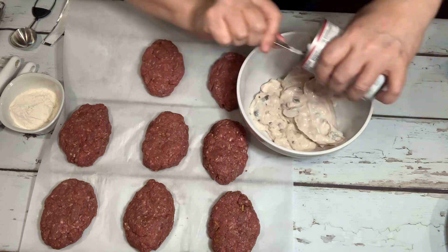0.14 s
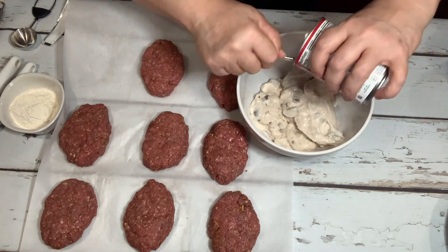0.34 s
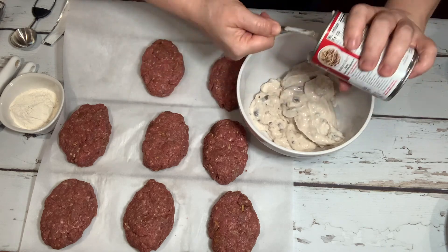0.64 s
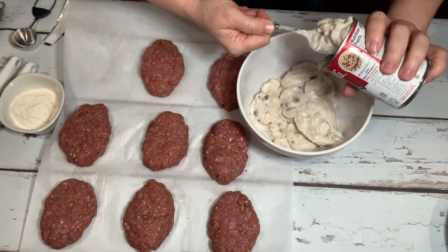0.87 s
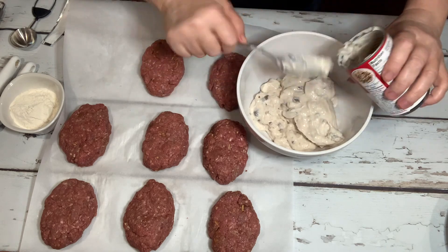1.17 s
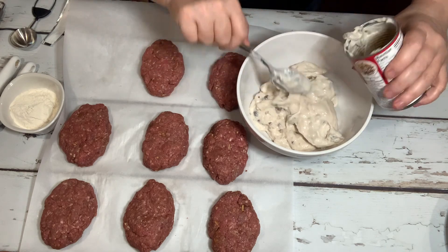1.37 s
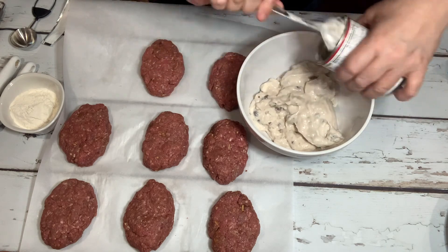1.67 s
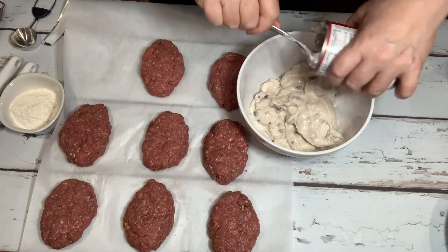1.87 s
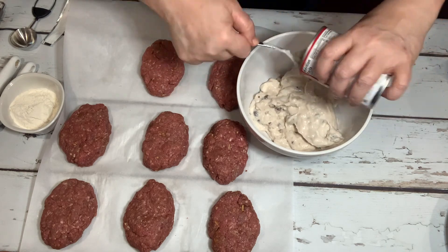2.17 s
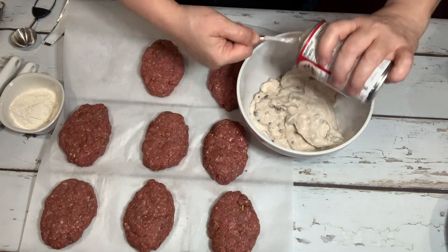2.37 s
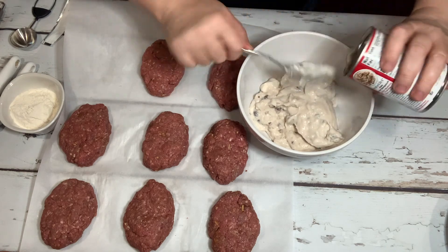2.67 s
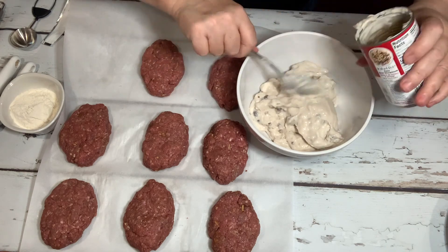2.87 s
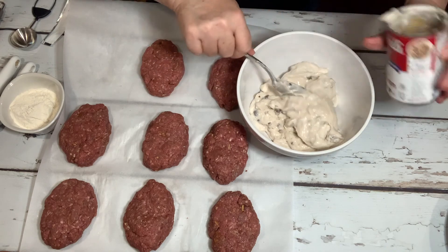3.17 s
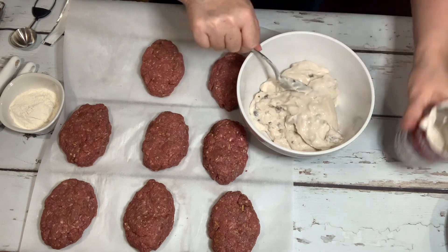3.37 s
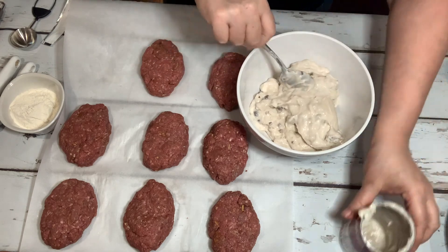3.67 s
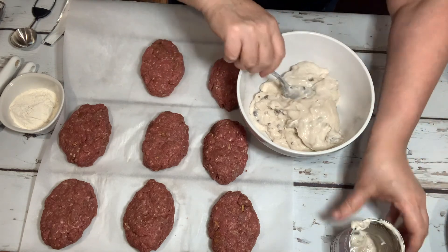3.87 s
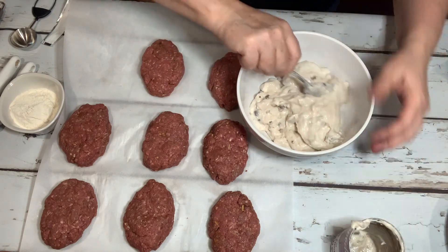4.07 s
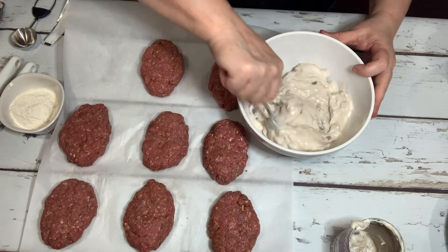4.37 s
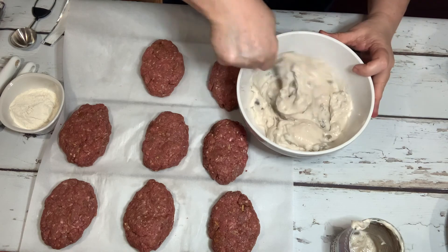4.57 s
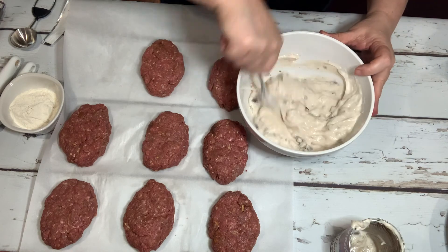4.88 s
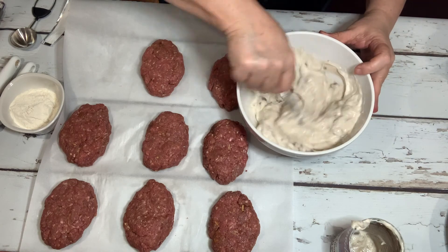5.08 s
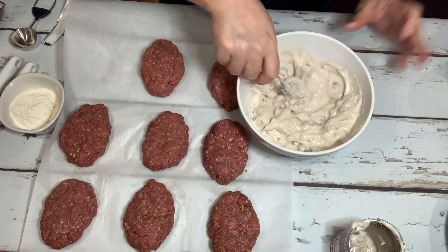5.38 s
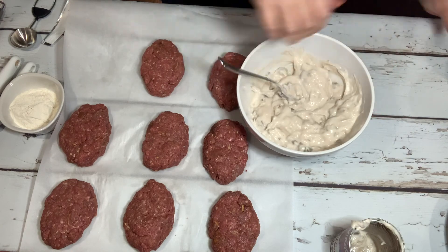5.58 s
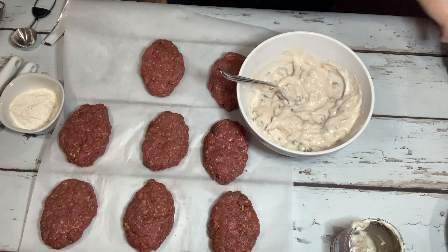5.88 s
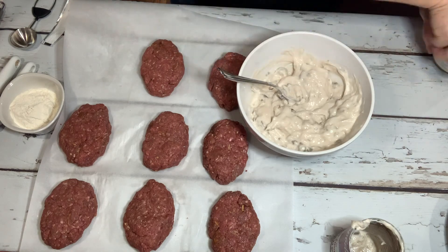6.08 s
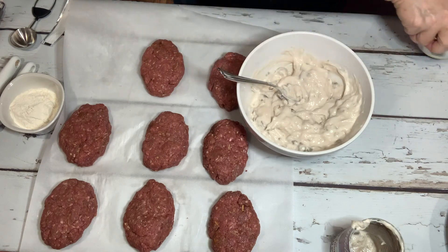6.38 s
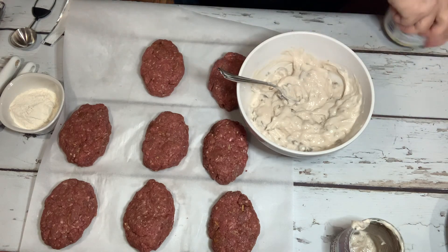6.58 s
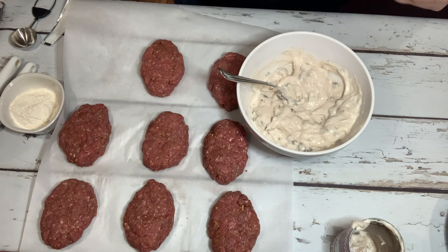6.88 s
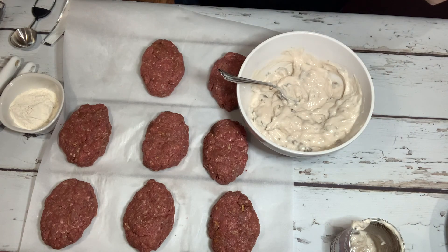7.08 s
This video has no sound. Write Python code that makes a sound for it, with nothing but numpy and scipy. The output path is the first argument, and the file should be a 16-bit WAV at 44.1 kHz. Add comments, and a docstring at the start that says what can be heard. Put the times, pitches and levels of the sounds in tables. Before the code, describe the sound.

A metal spoon scrapes thick food from a hollow tin can, clanks on a ceramic bowl, stirs with dull knocks, then a dish rubs across wood.

```python
"""A steel spoon scrapes thick soup out of a tin can into a ceramic bowl on a wooden kitchen table; an appliance hums.
0.2-2.5 s: stick-slip strokes, slides and taps excite the can's hollow note and wall modes; wet fizz follows.
3.1 s: the spoon clanks on the bowl's rim (beating modes). 3.7 s: the empty can lands on the table and rocks.
4.3-5.3 s: it stirs (gliding air-pocket notes) and knocks the filled bowl. 5.4 s: more rim clanks, then wet fizz.
6.3-7.2 s: a dish rubs over the boards (filtered slips and noise) and bumps. All in a small, hard room."""
import sys
import numpy as np
from scipy import signal
from scipy.fft import rfft, irfft, next_fast_len
from scipy.io import wavfile
from scipy.ndimage import map_coordinates

SR = 44100
rng = np.random.default_rng(int(sys.argv[2]) if len(sys.argv) > 2 else 0)


def wrap_up_sound(samples):
    """Save the sound to the file named by the first command line argument, as 16-bit audio."""
    columns = np.atleast_2d(samples).T
    # keep every value between -1 and 1, then stretch to whole-number steps
    tamed = np.clip(columns, -1, 1)
    steps = np.round(tamed * 32767).astype(np.int16)
    wavfile.write(sys.argv[1], SR, steps)


N = 319284
TIME = np.arange(N) / SR
T = np.arange(int(SR * 0.7)) / SR  # time within one blow or echo [s]


def amp(db):
    """Decibels to gain."""
    return 10 ** (np.asarray(db) / 20)


def unit(x):
    """Scaled to rms 1."""
    return x / np.sqrt(np.mean(x ** 2) + 1e-20)


def along(points, hz):
    """(Hz, value) points interpolated on a log-frequency axis."""
    point_hz, value = np.transpose(points)
    return np.interp(np.log(hz + 1), np.log(point_hz + 1), value)


def decay(t, t60_s):
    """Exponential decay of 60 dB in t60_s."""
    return np.exp(-np.log(1000) * t / t60_s)


def filtered(x, response):
    """x times a complex response of frequency."""
    n = x.shape[-1]
    padded = next_fast_len(n + 4096)
    hz = np.fft.rfftfreq(padded, 1 / SR)
    return irfft(rfft(x, padded) * response(hz), padded)[..., :n]


def coloured(x, spectrum):
    """x shaped by (Hz, dB) points."""
    return filtered(x, lambda hz: amp(along(spectrum, hz)))


def add(out, start_s, x):
    """Mix x into out from start_s."""
    part = out[:, round(start_s * SR):][:, :x.shape[1]]
    part += x[:, :part.shape[1]]


def wobble(rate_hz, size=N):
    """Smooth random curve, rate_hz knots a second."""
    knots = rng.standard_normal(int(size * rate_hz / SR) + 4)
    return map_coordinates(knots, [TIME[:size] * rate_hz])


def swell(t, length_s, attack_s, release_s):
    """Linear rise, hold to length_s, 60 dB fall in release_s."""
    return np.minimum(t / attack_s, 1) * decay(np.maximum(t - length_s, 0), release_s)


def gestures(rows, attack_s, release_s):
    """Swells from (start, length, dB, ...) rows: one gain curve per dB column."""
    out = np.zeros((len(rows[0]) - 2, N))
    for start_s, length_s, *levels_db in rows:
        t = np.arange(int((length_s + release_s) * SR)) / SR
        add(out, start_s, np.outer(amp(levels_db), swell(t, length_s, attack_s, release_s)))
    return out


def slips(rate_hz, spread_db):
    """Irregular tiny impulses of random sign, their sizes spread by spread_db."""
    hits = rng.random(N) < rate_hz / SR
    signs = rng.choice([-1, 1], N)
    sizes = amp(spread_db * np.clip(rng.standard_normal(N), -2, 2))
    return unit(hits * signs * sizes)


def resonate(x, hz, width_hz):
    """x through a one-pole complex resonance whose pitch may glide."""
    turn = np.exp(2j * np.pi * np.cumsum(hz + np.zeros(N)) / SR)
    pole = np.exp(-np.pi * width_hz / SR)
    return unit((signal.lfilter([1], [1, -pole], x / turn) * turn).real)


def friction_tone(hz, jitter, rough_db):
    """Stick and slip lock onto a resonance: an unbroken tone, unsteady in pitch and strength."""
    unsteady_hz = hz * (1 + jitter * wobble(200, len(hz)))
    phase = 2 * np.pi * np.cumsum(unsteady_hz) / SR
    return unit(np.sin(phase) * amp(rough_db * wobble(130, len(hz))))


def ring(modes, attack_s, detune=0):
    """One blow on (Hz, dB, t60) modes; the grip shifts their strength and, by detune, their pitch."""
    hz, db, t60_s = np.transpose(modes)[:, :, None]
    size_db, shift = rng.standard_normal((2, len(modes), 1))
    gain = amp(db + size_db)
    t = T[T < 1.2 * t60_s.max()]
    sign = (-1) ** np.arange(len(modes))[:, None]  # neighbouring modes swing against each other
    waves = sign * gain * decay(t, t60_s) * np.sin(2 * np.pi * hz * (1 + detune * shift) * t)
    x = waves.sum(axis=0) * (1 - np.exp(-t / attack_s)) / np.linalg.norm(gain)
    return np.pad(x, (0, len(T) - len(t)))


def burst(spectrum, t60_s):
    """Modes too crowded to tell apart: coloured noise that dies away."""
    noise = unit(coloured(rng.standard_normal(len(T)), spectrum))
    return noise * decay(T, t60_s) * (1 - np.exp(-T / 0.000099))


# travel time of a bending wave: (frequency [Hz], delay [s])
BENDING = [(100, .012), (300, .011), (600, .0055), (1000, 0), (2000, 0.0031), (4500, 0)]


def bent(x, path=1):
    """Low bending waves travel slowly, so a knock chirps downward, more so over a long path."""
    def response(hz):
        cycles = np.cumsum(along(BENDING, hz)) * hz[1]  # integral of the delay over frequency
        return np.exp(-2j * np.pi * path * cycles)
    return filtered(x, response)


# diffuse sound: (frequency [Hz], left-right correlation [-1 to 1])
ALIKE = [(100, 0.89), (300, 0.71), (700, -0.2), (1500, 0.36), (3000, -0.2), (7000, -0.061)]


def diffuse(n):
    """Stereo noise, alike in the bass and nearly unrelated in the treble."""
    def mid_side(hz):
        angle = np.arccos(np.clip(along(ALIKE, hz), -1, 1)) / 2
        return np.array([np.cos(angle), np.sin(angle)])
    mid, side = filtered(rng.standard_normal((2, n)), mid_side)
    return np.array([mid + side, mid - side])


# room decay: (frequency [Hz], t60 [s])
WALLS = [(150, 0.6), (800, 0.48), (2500, 0.58), (5000, 0.52), (10500, 0.44), (14000, 0.011)]
# air and walls swallow the top: (frequency [Hz], level [dB])
ECHO_COLOUR = [(11000, 0), (12300, -9), (13500, -24)]
# direct sound, opposite at the two ports: (frequency [Hz], phase [rad])
SKEW = [(150, 0), (1500, 0.17), (2000, 1.46), (2400, 2.5), (3000, 3), (4000, 3.5), (4600, 3.5), (5000, 5.5),
        (5600, 5.5), (6000, 6.5), (8000, 6.5), (10000, 7), (13000, 6), (16000, 8)]


def kitchen(x, room_db, early_db=-6, pan_db=-1):
    """Direct sound at two ports, quick echoes off the table, tail of the room; pan_db is left over right."""
    noise = diffuse(len(T))
    hz, t, z = signal.stft(noise, SR, nperseg=256)
    z = z * decay(t, along(WALLS, hz)[:, None])
    tail = signal.istft(z, SR, nperseg=256)[1][:, :len(T)]
    tail = tail * (1 - np.exp(-T / 0.0031))
    early = noise[:, ::-1] * decay(T, 0.15) * (T > 0.0015)
    echoes = amp(room_db) * tail / np.linalg.norm(tail[0]) + amp(early_db) * early / np.linalg.norm(early[0])
    echoes = coloured(echoes, ECHO_COLOUR)
    direct = filtered(x, lambda hz: np.exp(1j * np.outer([-1, 1], along(SKEW, hz))))
    direct = direct * amp([[pan_db / 2], [-pan_db / 2]])
    return direct + signal.fftconvolve(x[None], echoes, axes=1)[:, :len(x)]


# rush of air: (frequency [Hz], relative level [dB])
AIR = [(15, -65), (25, -25), (76, -2), (145, -10.5), (180, 1.5), (206, -24.5), (236, -4), (427, -11),
       (607, -18.5), (734, -17), (1260, -32), (1890, -30.5), (2110, -44.5), (5000, -38), (16000, -59.5)]
# hum lines: (frequency [Hz], half width at half amplitude [Hz], level [dB])
HUM = [(87.6, 5.1, -66), (118, 12, -69.5), (178.64, 6.2, -54.5), (231, 46, -68.5), (5100, 20, -85.5)]


def appliance():
    """Low rush of air, a few wavering hum lines and a thin whine: noise in narrow bands."""
    out = amp(-56.0) * unit(coloured(diffuse(N), AIR))
    for line_hz, width_hz, db in HUM:
        line = filtered(rng.standard_normal(N), lambda hz: 1 / (1 + ((hz - line_hz) / width_hz) ** 2))
        out = out + amp(db) * unit(line)
    return out


# loads on the table top: (time [s], level [dB])
THUMPS = [(3.1, -19), (3.135, -18.5), (3.67, -43), (4.309, -31), (4.512, -49), (4.858, -31.5), (5.174, -38),
          (5.446, -21.5)]
# board modes: (frequency [Hz], relative level [dB], t60 [s])
TABLE_MODES = [(76, -10.5, 0.27), (103, -4, 0.25), (155, 2.5, 0.09), (144, -12.5, 0.084),
               (214, -1.5, 0.051), (397.4, -9.5, 0.073)]


def table():
    """The boards boom on their low modes under the harder blows."""
    out = np.zeros((2, N))
    for start_s, db in THUMPS:
        boom = bent(ring(TABLE_MODES, attack_s=0.0038))
        add(out, start_s, kitchen(amp(db) * boom, room_db=-12, early_db=-23.5, pan_db=0.0))
    return out


# shoves of the dish: (start [s], length [s], rumble level [dB], rub level [dB])
SHOVES = [(6.32, 0.178, -67.5, -71.5), (6.48, 0.175, -49.5, -56), (6.67, 0.16, -58, -53.5),
          (6.86, 0.046, -60, -53), (6.93, 0.048, -59, -49.5), (7.02, 0.11, -56.5, -64),
          (7.15, 0.03, -51.5, -43.5)]
# rumble of the boards: (frequency [Hz], relative level [dB])
BOARDS = [(88, -52.5), (150, -16), (217, -6), (259, 1.5), (428, -3.5), (545, -16.5), (637, -15), (900, -37),
          (1170, -72), (1980, -120)]
# rub of dish on wood: (frequency [Hz], relative level [dB])
RUB = [(600, -16), (1050, -0.5), (1300, 3.5), (1500, -10), (2050, 2), (3000, -11.5), (4200, -9), (5500, -9),
       (7500, -11), (11000, -12.5), (13500, -20)]
# dish modes: (frequency [Hz], relative level [dB], t60 [s])
DISH_MODES = [(552, 0.5, 0.067), (786.7, -16, 0.11), (1040, -9, 0.033), (1314, -11, 0.054),
              (1790, -11, 0.034), (2050, -14, 0.037)]
# steel contact, also the dish's bump: (frequency [Hz], relative level [dB])
TICK = [(300, -8), (1500, -3), (4000, -3.5), (7000, -1), (10500, -3.5), (12500, -10.5), (16000, -11)]


def dish():
    """A dish rubs over the wood, judders once as it catches and bumps something as it leaves the table."""
    weight, speed = gestures(SHOVES, attack_s=0.041, release_s=0.11)
    rumble = amp(-0.5) * weight * unit(coloured(slips(rate_hz=500, spread_db=4.5), BOARDS))
    friction = rng.standard_normal(N)
    hiss = amp(-7) * unit(coloured(friction, RUB))
    rub = speed * (hiss + amp(-14) * resonate(friction, 1284, width_hz=39))
    judder = amp(-34.5) * np.exp(-((TIME - 6.608) / 0.015) ** 2) * np.sin(2 * np.pi * 220 * TIME)
    out = kitchen(rumble + rub + judder, room_db=-2.5)
    bump = ring(DISH_MODES, attack_s=0.0013) + amp(-17) * burst(TICK, t60_s=0.045)
    add(out, 7.192, kitchen(amp(-30) * bump, room_db=-8.5))
    return out


# soup parts or slumps back: (start [s], length [s], level [dB])
SQUELCHES = [(1.27, 0.036, -81.5), (1.44, 0.37, -80.5), (2.47, 0.039, -62), (2.64, 0.75, -73.5),
             (3.09, 0.11, -68), (4.38, 0.26, -60.5), (4.76, 0.1, -72), (5.19, 0.042, -63.5),
             (5.6, 0.088, -65.5), (5.68, 0.2, -64), (5.9, 0.064, -75), (6.0, 0.25, -83.5)]
# wet fizz: (frequency [Hz], relative level [dB])
WET = [(500, -2), (1400, -1.5), (2600, -8.5), (4000, -6.5), (7000, -4.5), (10500, -5), (12200, -9),
       (13500, -26), (16000, -42)]


def soup():
    """Sticky fizz of tiny slips; thick soup is slow to move and to settle."""
    motion, = gestures(SQUELCHES, attack_s=0.025, release_s=0.54)
    uneven = unit(amp(1.8 * wobble(11) + 2 * wobble(55)))
    fizz = unit(coloured(slips(rate_hz=270, spread_db=3.5), WET))
    return kitchen(motion * uneven * fizz, room_db=2.0)


# turns of the spoon through the soup: (start [s], length [s], level [dB])
STIRS = [(4.32, 0.2, -59), (4.53, 0.13, -57.5), (4.87, 0.12, -54), (5.19, 0.078, -58.5)]


def stirring(count=520):
    """Air pockets open and close behind the spoon, each a short note that glides up or down."""
    middle_hz, life_cycles, glide_spread = 896, 7, 0.19
    pockets, t = np.zeros((1, N)), T[:SR // 16]
    starts_s = np.linspace(0, TIME[-1], count) + rng.random(count) / 50
    for start_s, (size, bend, strength) in zip(starts_s, rng.standard_normal((count, 3))):
        pocket_hz = middle_hz * np.exp(0.35 * size)
        age = t * pocket_hz / life_cycles
        glide_hz = pocket_hz * np.exp(glide_spread * bend * np.tanh(age / 2))
        note = age * np.exp(-2 * age) * np.sin(2 * np.pi * np.cumsum(glide_hz) / SR)
        add(pockets, start_s, amp(3 * strength) * note[None])
    push, = gestures(STIRS, attack_s=0.02, release_s=0.12)
    return kitchen(push * unit(pockets[0]), room_db=-9.5)


# metal edge on can, bowl or table:
# (start [s], length [s], tone level [dB], grit level [dB], first pitch [Hz], last pitch [Hz])
SLIDES = [(0.226, 0.11, -39, -56, 1013, 1078), (0.285, 0.04, -45, -55.5, 1950, 1840),
          (0.498, 0.077, -44, -67, 1063, 950), (0.518, 0.059, -58, -70, 2410, 2130),
          (0.628, 0.088, -59.5, -68, 2780, 2730), (0.635, 0.014, -44.5, -62, 1540, 1850),
          (0.791, 0.04, -55, -58, 4050, 3930), (0.814, 0.039, -49.5, -65, 2387, 2300),
          (0.969, 0.018, -48.5, -71.5, 2420, 2350), (2.004, 0.038, -47.5, -59.5, 1100, 750),
          (2.363, 0.026, -50.5, -52.5, 807, 1256), (3.642, 0.024, -51, -54, 1390, 1234),
          (4.35, 0.051, -42.5, -53, 947, 1000), (4.41, 0.075, -52.5, -67, 1027, 885),
          (4.519, 0.036, -40.5, -53, 562, 360), (4.54, 0.045, -47, -56, 1256, 1127),
          (4.572, 0.025, -54.5, -58.5, 740, 608), (4.638, 0.023, -56, -66, 1240, 1118),
          (4.64, 0.025, -50, -70, 480, 410), (4.897, 0.048, -44.5, -49.5, 1663, 1520),
          (4.924, 0.046, -45, -51, 894, 1030), (4.945, 0.031, -46.5, -56, 1550, 1480),
          (4.961, 0.024, -36, -53.5, 944, 870), (5.006, 0.024, -52, -64.5, 1630, 1526),
          (5.02, 0.055, -54.5, -71, 328, 515), (5.176, 0.038, -40, -49.5, 563, 495),
          (5.224, 0.041, -49.5, -52.5, 778, 850), (5.232, 0.057, -57.5, -59.5, 1503, 1290)]
# grit under a wet edge: (frequency [Hz], relative level [dB])
SMEAR = [(300, -8.5), (600, -2.5), (950, 0.5), (1500, 0), (2200, -3), (3000, -6), (3900, -0.5),
         (5000, -15.5), (7000, -16.5), (11000, -17), (14000, -38)]


def sliding():
    """Short gritty slides, each with a rough tone that glides as the contact moves."""
    attack_s, release_s = 0.016, 0.054
    tones, t = np.zeros((1, N)), T[:SR // 4]
    for start_s, length_s, tone_db, _, first_hz, last_hz in SLIDES:
        glide_hz = np.interp(t, [0, length_s], [first_hz, last_hz])
        squeak = friction_tone(glide_hz, jitter=0.035, rough_db=4)
        add(tones, start_s, amp(tone_db) * swell(t, length_s, attack_s, release_s) * squeak[None])
    grit_rows = [(start_s, length_s, grit_db) for start_s, length_s, _, grit_db, _, _ in SLIDES]
    bite, = gestures(grit_rows, attack_s, release_s)
    grains = amp(4.5 * wobble(90)) * slips(rate_hz=800, spread_db=4)
    smear = bite * unit(coloured(grains, SMEAR))
    return kitchen(amp(-9.5) * tones[0] + amp(-1.0) * smear, room_db=-9.5)


def knocks(rows, hollow, metal, buzz, hollow_db, metal_db, buzz_db, buzz_t60_s, tick_db, tick_t60_s,
           path, room_db, pan_db, base=()):
    """Each contact ticks and buzzes, rings the metal and sounds the vessel's hollow and base."""
    out = np.zeros((2, N))
    for start_s, db, pitch_hz, ring_db, crack_db in rows:
        modes = [(pitch_hz * ratio, level_db, t60_s) for ratio, level_db, t60_s in hollow] + list(base)
        body = ring(modes, attack_s=0.0006, detune=0.013)
        walls = ring(metal, attack_s=0.00071, detune=0.0065)
        contact = amp(tick_db) * burst(TICK, tick_t60_s) + amp(buzz_db) * burst(buzz, buzz_t60_s)
        x = amp(hollow_db) * body + amp(metal_db + ring_db) * walls + amp(crack_db) * contact
        add(out, start_s, kitchen(amp(db) * bent(x, path), room_db, early_db=-7.5, pan_db=pan_db))
    return out


# empty can on the table: (time [s], level [dB], hollow pitch [Hz], wall ring level [dB], tick level [dB])
SET_DOWN = [(3.673, -15.5, 756, -23, -37), (3.707, -30, 773, -34, -27.5), (3.727, -27, 745, -32.5, -34.5),
            (3.756, -36.5, 760, -34, -32)]
# empty can's hollow modes: (ratio to the pitch [1], relative level [dB], t60 [s])
EMPTY_CAN = [(0.29, -5, 0.022), (.46, -2.5, 0.015), (1, 3.5, 0.062), (1.29, 0, 0.078), (1.7, -15.5, 0.043),
             (2.32, -11.5, 0.02), (2.68, -21.5, .04), (3.1, -19, 0.026)]
# can wall modes: (frequency [Hz], relative level [dB], t60 [s])
CAN_WALL = [(930, 3, .03), (1035, 5, .04), (1400, -5, .025), (1900, -9, .05), (2130, -3, .06),
            (2350, -9, .04), (2530, 0, .035), (2640, -6, .045), (2850, -10, .05), (3690, -6, .04),
            (3900, -7, .03), (4080, 1, .033), (4220, -7, .04), (4500, -9, .04), (4850, -9, .04),
            (6250, -13, .04)]
# can's fine, crowded modes: (frequency [Hz], relative level [dB])
CAN_BUZZ = [(300, -6.5), (900, 8), (1500, 0), (2400, -3), (3200, -0.5), (4100, -2), (5200, -13),
            (9000, -13), (14000, -31)]


def set_down():
    """The empty can lands on the table and rocks; its hollow rings longer than the full one."""
    return knocks(SET_DOWN, EMPTY_CAN, CAN_WALL, CAN_BUZZ, hollow_db=-1.0, metal_db=-14,
                  buzz_db=11.5, buzz_t60_s=0.046, tick_db=-1.5, tick_t60_s=0.35,
                  path=0.16, room_db=-4.5, pan_db=-1.0)


# spoon on the filled bowl: (time [s], level [dB], knock pitch [Hz], spoon ring level [dB], tick level [dB])
BOWL_KNOCKS = [(1.283, -49.5, 736, -15.5, -6.5), (2.741, -41, 860, -25, -18.5), (2.894, -53, 843, -5, -0.5),
               (4.309, -8.5, 913, 0.5, -32.5), (4.315, -19, 742, 7, -28), (4.512, -7, 717, -33, -22),
               (4.721, -57, 785, -33, -1), (4.764, -25, 707, 1, -22.5), (4.856, -4, 861, -16, -28.5),
               (4.956, -18.5, 886, -18.5, -22.5), (5.098, -45.5, 867, -13.5, -28.5),
               (5.172, -10.5, 872, -17, -30.5), (5.281, -45, 809, -13.5, -11)]
# filled bowl's hollow modes: (ratio to the pitch [1], relative level [dB], t60 [s])
BOWL_HOLLOW = [(.57, -1.5, 0.014), (0.839, -2, 0.028), (1.001, 5.5, 0.023), (1.3, -2.5, 0.018),
               (1.7, -2.5, .026), (2.05, -5.5, 0.018)]
# spoon modes: (frequency [Hz], relative level [dB], t60 [s])
SPOON = [(1180, -2.5, 0.044), (1270, 1, .06), (1415, -3, .04), (1660, -2.5, .05), (1960, -0.5, 0.11),
         (2250, -4, .05), (2780, -3, .035), (2900, -3, .05), (3038, -1.5, .035), (3230, -4.5, 0.039),
         (3870, -5, .025), (4140, -0.5, 0.069), (4270, -2, 0.032), (4616, -5, .025), (4900, -7, .025),
         (5000, -8.5, 0.037), (7100, -21.5, .05)]
# fine, crowded modes of the knock: (frequency [Hz], relative level [dB])
BOWL_BUZZ = [(400, -7), (900, -1), (1500, 1.5), (2000, -7), (3000, -10.5), (4500, 2), (5500, -6),
             (9000, -13.5), (14000, -27.5)]


def bowl_knocks():
    """The spoon knocks the filled bowl: short hollow modes, with the spoon's own ring."""
    return knocks(BOWL_KNOCKS, BOWL_HOLLOW, SPOON, BOWL_BUZZ, hollow_db=-6.0, metal_db=-13.0,
                  buzz_db=5.0, buzz_t60_s=0.04, tick_db=11.5, tick_t60_s=0.021,
                  path=0.3, room_db=-9.0, pan_db=-1.0)


# steel on the bare rim: (time [s], level [dB], bowl body level [dB], clash level [dB],
# clash pitch [Hz], tick level [dB], lasting ring level [dB])
CLANKS = [(3.098, -5, -11.5, 2, 5100, -3.5, -18), (3.102, -7.5, -12, 7, 4950, -2, -1.5),
          (3.106, -10, -17.5, 4.5, 4890, -7.5, -12.5), (3.123, -24, -4, -2, 4880, -11.5, 4.5),
          (5.445, -5.5, -0.5, 3.5, 3700, -7, -16.5), (5.4475, -12, 0, 4.5, 5200, -11, -20),
          (5.464, -24, 2.5, 6, 4900, -9.5, -19), (5.471, -21.5, 6.5, 4.5, 3400, -8.5, -18),
          (5.489, -20.5, 4.5, 10, 4270, -3, -12), (5.494, -27, 8.5, 8, 2980, -9, -19)]
# crowded modes of the clash: (ratio to the clash pitch [1], relative level [dB])
CLASH = [(0.079, -21.5), (.28, -4.5), (.45, -5), (.75, -0.5), (1, 1.5), (1.15, -1), (1.45, -8),
         (2.3, -15.5), (2.9, -41.5)]
# rim modes: (frequency [Hz], relative level [dB], t60 [s])
RIM = [(2325, -1.5, 0.18), (2820, -4.5, 0.13), (3240, -4.5, 0.22), (3547, 4.5, 0.14), (3685, -4, 0.058),
       (4044, -2, 0.08), (4555, -6, .07), (4740, 0, 0.06), (5020, 2, 0.061), (5100, -2.5, .09),
       (5370, -0.5, 0.11), (5470, -1.5, 0.051), (5600, -6.5, 0.09), (6900, -6.5, 0.09), (7150, -7.5, 0.11),
       (8230, -3, 0.11), (9040, -7.5, 0.12)]
# bowl body modes: (frequency [Hz], relative level [dB], t60 [s])
BOWL_BODY = [(434, -22.5, 0.11), (626, -15, 0.13), (923, -5, 0.053), (1117, -4.5, 0.0065), (1427, -3, 0.06),
             (1318, -9.5, 0.043), (1545, -8.5, 0.04), (1898, -14, 0.09), (2137, -13.5, 0.22)]
# lasting modes: (frequency [Hz], relative level [dB], t60 [s])
FREE_RING = [(1440, -7, .35), (1500, -2, .4), (1530, -2, .42), (1580, -4, .38), (1655, -4, .38),
             (1990, -5, .33), (2085, -3, .36), (2159, 1, .38), (2422, -7, .35), (2837, -7, .33),
             (3090, -7, .3), (3542, 1, .33), (3582, 0, .29), (4484, -8, .18), (4605, -4, .18),
             (4793, -3, .17), (5235, -4, .17), (5685, -7, .25)]


def clanks():
    """Hard blows on the rim, which no soup damps, clash; close pairs of modes beat as they ring on."""
    out = np.zeros((2, N))
    for start_s, db, body_db, clash_db, clash_hz, crack_db, free_db in CLANKS:
        clash = [(clash_hz * ratio, level_db) for ratio, level_db in CLASH]
        # the contact favours modes near its own pitch
        rim_modes = [(hz, level_db + along(clash, hz), t60_s) for hz, level_db, t60_s in RIM]
        rim = amp(-12.0) * ring(rim_modes, attack_s=0.00036, detune=0.003)
        body = amp(body_db - 6.5) * ring(BOWL_BODY, attack_s=0.0004)
        crash = amp(clash_db - 11.0) * burst(clash, t60_s=0.032)
        tick = amp(crack_db - 5.0) * burst(TICK, t60_s=0.019)
        blow = amp(db) * bent(rim + body + crash + tick)
        add(out, start_s, kitchen(blow, room_db=-8.5, early_db=-10, pan_db=1.0))
        lasting = amp(db + free_db - 14.5) * ring(FREE_RING, attack_s=0.00062)
        add(out, start_s, kitchen(lasting, room_db=-6.5, early_db=-14))
    return out


# can's hollow note over two scoops: (time [s], pitch [Hz])
CAN_NOTE = [(0.2, 788), (0.5, 771), (0.56, 741), (0.61, 662), (0.78, 638), (0.87, 658.7), (1.03, 688),
            (1.72, 704.5), (2.03, 727), (2.15, 691), (2.35, 681), (2.5, 732)]


def can_note(s):
    """Pitch of the can's hollow at time s, which moves with the spoon's place."""
    return np.interp(s, *np.transpose(CAN_NOTE))


# spoon on the can: (time [s], level [dB], wall ring level [dB], tick level [dB])
CAN_TAPS = [(0.155, -26.5, -33, -21), (0.207, -10.5, -5.5, -21), (0.216, -24.5, -2, -33),
            (0.86, -24.5, -37, -36), (0.987, -30.5, -33, -41), (1.026, -23.5, -29, -33),
            (1.696, -25, -14, -20), (1.728, -16.5, -28, -18), (1.852, -37.5, -20, -37),
            (2.031, -37, -29, -39), (2.097, -38.5, -12.5, -24.5), (2.145, -30.5, -23, -35),
            (2.218, -34, -21, -17.5), (2.29, -37, -39, -42), (2.387, -39, -19, -16),
            (2.495, -37, -31, -18.5)]
# can's hollow modes: (ratio to the pitch [1], relative level [dB], t60 [s])
CAN_HOLLOW = [(1.001, 3.5, 0.043), (1.17, -10, 0.011), (1.899, -26.5, 0.0081)]
# can's flat end: (frequency [Hz], relative level [dB], t60 [s])
CAN_BASE = [(1009, -10, 0.071)]


def can_taps():
    """The spoon taps the can: hollow note of the moment, flat end and wall modes."""
    rows = [(start_s, db, can_note(start_s), ring_db, tick_db) for start_s, db, ring_db, tick_db in CAN_TAPS]
    return knocks(rows, CAN_HOLLOW, CAN_WALL, CAN_BUZZ, hollow_db=-2.0, metal_db=4.5,
                  buzz_db=8.5, buzz_t60_s=0.045, tick_db=3.5, tick_t60_s=0.036,
                  path=0.403, room_db=-8, pan_db=-1.5, base=CAN_BASE)


# rasp of the edge: (frequency [Hz], relative level [dB])
RASP = [(710, -28.5), (1200, -12.5), (1550, -14), (1900, -3.5), (2340, -3.5), (2900, -12), (3570, -5),
        (4100, -5.5), (4600, -12), (5170, -10.5), (6960, -5.5), (8040, -10.5), (11300, -11), (14000, -38.5)]


def grit():
    """Clumps of tiny slips ring the wall, whose resonances wander with the point of contact."""
    grains = amp(4.5 * wobble(110)) * slips(rate_hz=700, spread_db=4)
    wall = sum(resonate(grains, hz * (1 + 0.07 * wobble(16)), width_hz=130) for hz in (1550, 2400, 3100, 4050))
    return unit(coloured(grains + amp(-9) * wall, RASP))


# spoon along the can's wall: (start [s], length [s], groan level [dB], chatter level [dB], rasp level [dB])
STROKES = [(0.153, 0.084, -43, -42, -45.5), (0.465, 0.02, -51, -50, -64), (0.485, 0.029, -48, -46, -59.5),
           (0.515, 0.074, -42.5, -48, -59), (0.59, 0.068, -45.5, -45.5, -61.5),
           (0.635, 0.012, -66, -63, -71), (0.68, 0.066, -55.5, -54, -66), (0.76, 0.034, -46, -49, -67),
           (0.79, 0.062, -50, -48, -52), (0.862, 0.027, -42, -52, -70), (0.89, 0.05, -51.5, -58, -74),
           (0.96, 0.071, -45, -47, -62.5), (1.05, 0.063, -68, -76, -90), (1.8, 0.1, -66, -59, -63),
           (1.895, 0.027, -59, -55, -49), (2.02, 0.042, -48.5, -47, -65), (2.11, 0.086, -61, -49.5, -58.5),
           (2.235, 0.042, -62, -69, -69), (2.285, 0.063, -55, -51.5, -58), (2.34, 0.054, -56, -55, -53.5),
           (2.488, 0.044, -55, -50, -50)]
# what the can's mouth radiates: (frequency [Hz], relative level [dB])
HOLLOW_BAND = [(250, -22.5), (600, 4.5), (1100, -5.5), (2000, 3), (10000, -8.5), (14000, -30)]


def scraping():
    """The spoon's edge sticks and slips on the tin: groan on the hollow note, chatter and rasp."""
    pressure, skip, bite = gestures(STROKES, attack_s=0.013, release_s=0.046)
    pitch_hz = can_note(TIME)
    groan = friction_tone(pitch_hz, jitter=0.028, rough_db=2)
    edge = amp(1.6 * wobble(38)) * slips(rate_hz=440, spread_db=0.0)
    chatter = resonate(edge, pitch_hz * 1.06, width_hz=170) + amp(-7.5) * resonate(edge, 1015, width_hz=31)
    chatter = unit(coloured(chatter, HOLLOW_BAND))
    scrape = amp(-3.0) * pressure * groan + amp(-6.0) * skip * chatter + amp(-2.5) * bite * grit()
    catching = unit(amp(2 * wobble(170)))
    return kitchen(catching * scrape, room_db=-4.5, early_db=-8.5, pan_db=-1.0)


def scene():
    """Everything on the table, in the kitchen."""
    background = appliance() + table() + dish()
    wet = soup() + stirring()
    blows = set_down() + bowl_knocks() + clanks() + can_taps()
    return background + wet + blows + sliding() + scraping()


# microphone response: (frequency [Hz], level [dB])
MICROPHONE = [(20, -8.5), (45, -3), (80, 1), (10500, 0.5), (12500, 0.5), (14000, -4.5), (16500, -12.5)]


def record(dry):
    """The small microphone dulls both ends of the range and keeps nothing above its band limit."""
    top_hz = 16600
    return filtered(coloured(dry, MICROPHONE), lambda hz: hz < top_hz)


dry = scene()
out = record(dry)
wrap_up_sound(out)
```